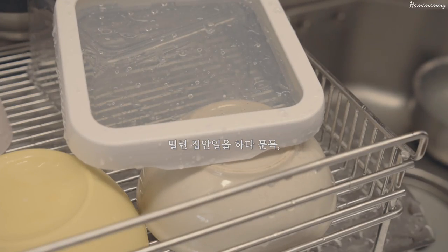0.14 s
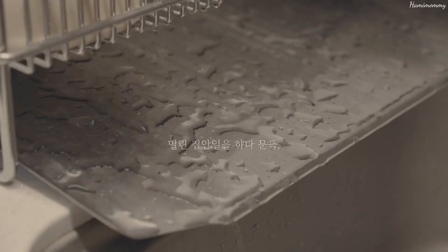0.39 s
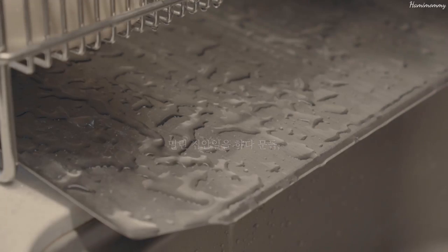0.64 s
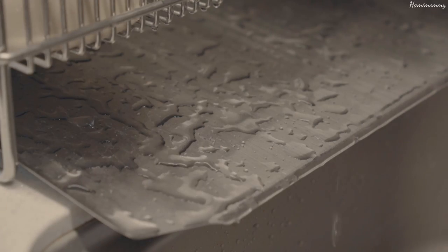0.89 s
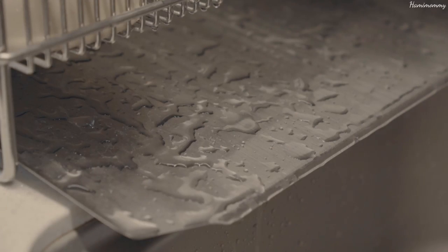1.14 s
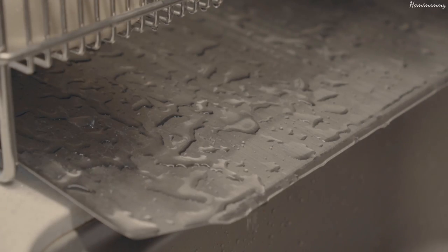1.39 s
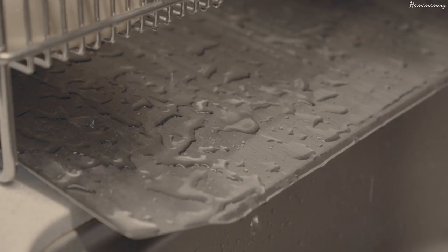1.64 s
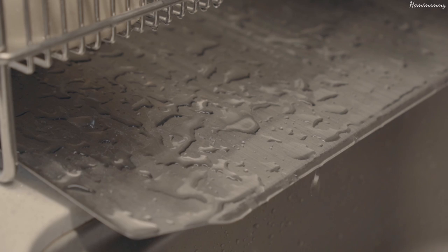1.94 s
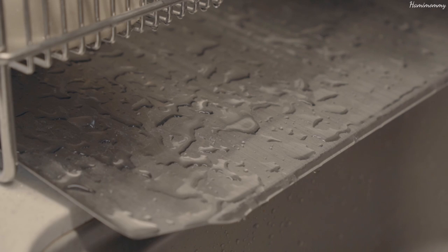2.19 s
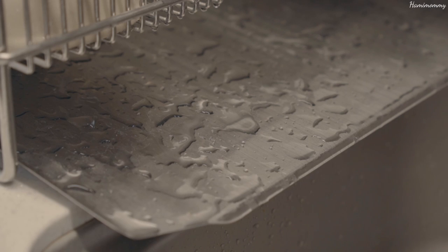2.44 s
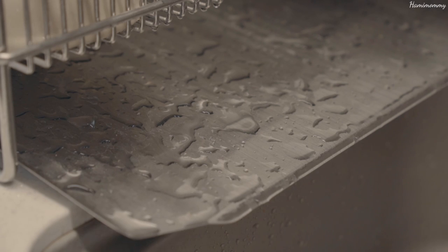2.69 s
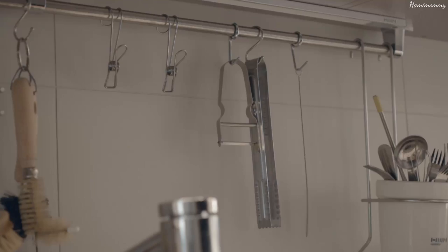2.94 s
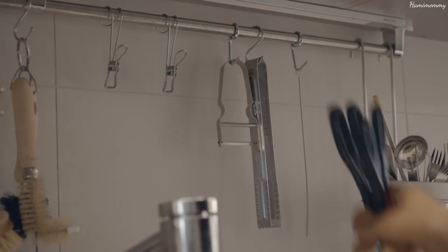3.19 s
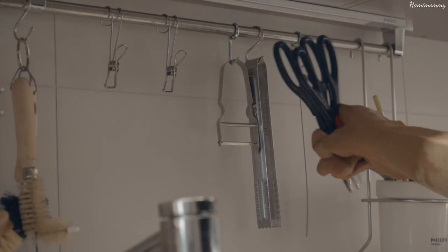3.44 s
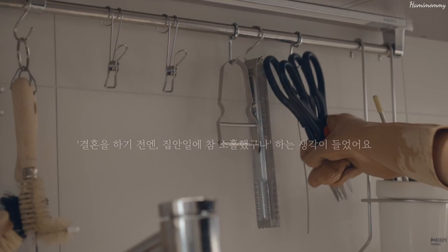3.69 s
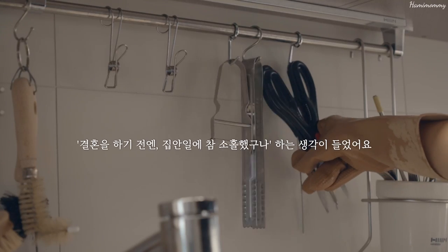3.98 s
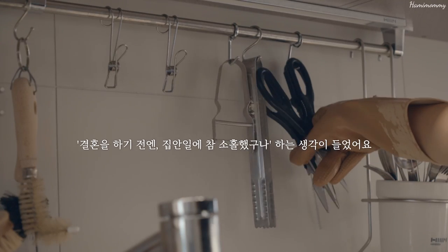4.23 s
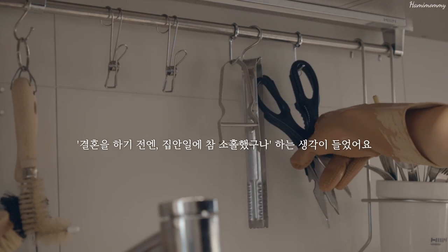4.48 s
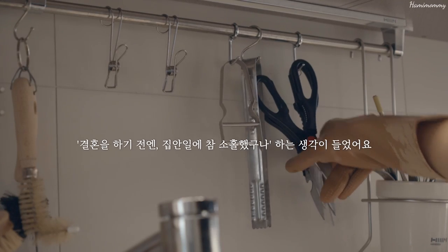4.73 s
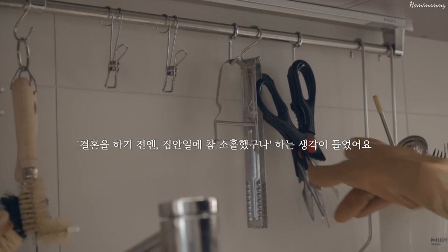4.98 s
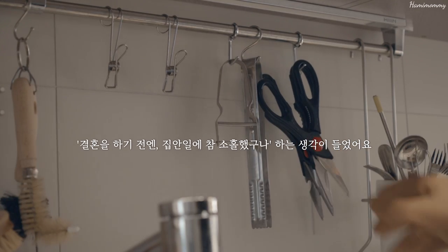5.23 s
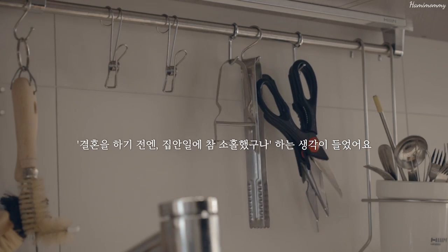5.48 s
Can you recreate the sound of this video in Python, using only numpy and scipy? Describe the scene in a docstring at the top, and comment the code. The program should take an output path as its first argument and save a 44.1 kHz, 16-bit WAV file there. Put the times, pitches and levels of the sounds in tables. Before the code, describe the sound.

Hollow plastic clatter and wet squelches, a short gush of water in a sink, then a hard cut to close, bright scissors jingling on a hook.

```python
"""Wet plastic tubs knock and squelch in a wire rack, then a tap runs into a steel sink and fades out. After a hard
cut, closer and louder, scissors are hung on a hook, clinking and sliding on the steel rail.
Knocks, clinks and sliding drive banks of ringing modes; water is clicks and noise given a colour, plus bubble tones.
Each shot has its own room tone and its own share of the kitchen's reverberation."""
import sys
import numpy as np
from scipy import signal
from scipy.fft import rfft, irfft, next_fast_len
from scipy.io import wavfile
from scipy.ndimage import uniform_filter1d

SR = 44100
rng = np.random.default_rng(int(sys.argv[2]) if len(sys.argv) > 2 else 0)


def unload_audio(sound):
    """Save the sound as a 16-bit wav file, at the path given as the first command line argument."""
    columns = np.transpose(np.atleast_2d(sound))
    # keep every value between -1 and 1, then stretch to whole-number steps
    steps = np.round(np.clip(columns, -1, 1) * 32767)
    wavfile.write(sys.argv[1], SR, steps.astype(np.int16))


def undo_db(level):
    """Turn decibels back into plain size, where 20 dB means ten times bigger."""
    steps = np.asarray(level, float) / 20
    return 10 ** steps


N = 247842   # length in samples
CUT_S = 3.0065   # the far shot ends, the close shot starts

# Room tone of the two shots. Each row: frequency in Hz, relative density in dB per Hz.
FAR_TONE = [(12, -25), (20, 6.5), (85, -7), (129, 3), (185, -13), (382, -8), (581, -13.5), (1040, -15.5),
            (2210, -24.5), (3350, -25.5), (15500, -37)]
CLOSE_TONE = [(12, -26), (20, 3), (185, -5.5), (298, -2), (452, -10.5), (725, -8), (811, -8.5),
              (1770, -18.5), (5090, -27), (8400, -29), (15500, -44)]
# Loudness of the far tone. Each row: time in seconds, rms level in dB.
FAR_LEVEL = [(0, -53.5), (.5, -62.5), (1, -61), (1.4, -65.5), (2, -60), (2.5, -64), (2.9, -89), (3, -100)]
CLOSE_DB = -49   # the close tone drifts about this level
# Rumble of the moving arm. Each row: frequency in Hz, relative density in dB per Hz.
RUMBLE_COLOUR = [(12, -37), (20, -3), (32, -3), (54, -15), (114, 0.5), (157, -9.5), (274, -5), (397, -8),
                 (600, -7.5), (780, -9.5), (1320, -120)]
# Arm rumble at mean effort, its share of the swing in effort, and the span that smooths the effort
ARM_DB, ARM_FOLLOWS, ARM_SMOOTH_S = -48.5, 0.64, 0.097
KITCHEN_T60_S, WALL_CUT_HZ = 0.35, 12000   # decay at low pitch; treble cut on every round

# Tubs and bowls knocking. Each row: time in seconds, level in dB before layer offsets, pitch in Hz.
KNOCKS = [(0.015, -38.5, 830), (0.098, -43, 1250), (0.15, -32, 1110), (0.17, -23, 1210), (0.195, -32, 1470),
          (0.228, -29, 1220), (0.259, -34.5, 930), (0.368, -44, 910), (0.399, -36, 1470),
          (0.462, -44, 1380), (0.478, -32, 1420), (0.519, -27, 1230), (0.565, -25, 1355),
          (0.609, -25.5, 1570), (0.64, -33, 916), (0.714, -39, 1410), (0.746, -53, 975),
          (0.764, -32.5, 826), (0.789, -48, 1350), (1.062, -34.5, 1200), (1.057, -46, 1650),
          (1.075, -39, 1000), (1.082, -42, 708), (1.088, -42.5, 450), (1.278, -56, 1230),
          (1.483, -52, 1440), (1.547, -45.5, 680)]
# Modes of hollow plastic. Each row: frequency in Hz, relative level in dB, 60 dB decay in seconds.
TUB_MODES = [(322, -41, 0.13), (455.5, -12.5, 0.16), (766, -16, 0.12), (935, -5.5, 0.087),
             (1110, -8.5, 0.026), (1230, -4, 0.018), (1380, -1, 0.024), (1570, -0.5, 0.019),
             (1793, -5.5, 0.057), (2020, -15, 0.041), (2400, -12, 0.035), (2890, -17, 0.036)]
# Tubs dragged over the rack wires. Each row: start in seconds, hold in seconds, drag in dB before layer offsets,
# wet squelch relative to the drag in dB, tone of contact in Hz.
STROKES = [(.012, 0.0089, -45.5, -20, 1110), (.095, 0.035, -49, -17, 1170), (.165, 0.048, -42, -28, 1250),
           (.26, 0.014, -47, -12, 1000), (.305, 0.038, -53, -13, 1140), (.37, .06, -50, -12, 1250),
           (.461, 0.075, -43.5, -14, 1300), (0.565, 0.066, -41, -8, 1410), (.69, 0.021, -58, -16, 1220),
           (0.75, 0.041, -41, -10.5, 1170), (.86, .1, -61.5, -14, 1100), (1.064, 0.021, -42.5, -17.5, 1140),
           (1.14, 0.065, -64, -23, 1200), (1.28, .005, -68, -24, 1150), (1.487, 0.017, -68, -4, 1180)]
GRIP_DB_PER_S, LET_GO_DB_PER_S = 1800, 309   # how fast a stroke sets in and dies
# Colour of wet squelch. Each row: frequency in Hz, relative density in dB per Hz.
SQUELCH = [(1290, -19), (2200, 1.5), (3620, -5), (5960, -7.5), (6520, -12.5), (7250, -8.5), (9970, -20.5),
           (15500, -28)]
# Light ticks on the rack wires. Each row: time in seconds, level in dB before layer offsets, pitch in Hz.
WIRE_TICKS = [(.02, -45, 5000), (.133, -42, 2900), (.135, -42.5, 3700), (.262, -41, 4120),
              (.268, -40, 5700), (.52, -41, 3120), (.755, -39, 4900), (.99, -54, 10500), (1.058, -45, 3560),
              (1.065, -38, 2400), (1.36, -55.5, 3350), (1.362, -59, 7100), (1.51, -54, 7600)]
# Modes of a glass rim. Each row: frequency in Hz, level in dB, 60 dB decay in seconds.
GLASS_MODES = [(4253, -57, .26), (8538, -57, .16), (7617, -63, .08)]
GLASS_TOUCH_S = 1.062

# The tap opens, surges once and is faded out. Each row: time in seconds, spray level in dB.
FLOW = [(1.47, -85), (1.53, -70), (1.555, -58), (1.585, -58), (1.61, -49.5), (1.8, -49), (1.832, -40),
        (2.02, -47.5), (2.35, -48), (2.7, -54), (2.82, -61.5), (2.96, -71.5), (3.0, -102)]
# Colours of the spray and of the drumming basin. Each row: frequency in Hz, relative density in dB per Hz.
SPRAY = [(710, -12), (1200, -3), (1350, -11), (1550, -2.5), (2090, -5.5), (2800, -2), (6440, -2),
         (8070, -0.5), (10100, -7.5), (13900, -8.5), (15500, -12.5)]
BASIN = [(35, -47), (60, -32), (114, 3.5), (290, -10), (449, -1.5), (623, -4), (1920, -9), (2500, -24),
         (3250, -32), (5500, -120)]
# Gulps of water landing. Each row: time in seconds, level in dB before layer offsets, bubble pitch in Hz,
# basin boom in dB.
SPLASHES = [(1.592, -31.5, 7950, -54), (1.808, -34.5, 3360, -80), (1.83, -24, 2000, -47),
            (1.866, -25.5, 3370, -53), (1.956, -31.5, 7970, -53), (2.215, -37, 3400, -58),
            (2.381, -39, 1250, -45.5), (2.565, -36, 4530, -80), (2.711, -40, 5730, -83)]
# Modes of the steel basin. Each row: frequency in Hz, relative level in dB, 60 dB decay in seconds.
BASIN_MODES = [(98, -4, .22), (118, -2, .25), (150, -4, .15), (210, -6, .1), (320, -8, .08),
               (460, -10, .06), (950, -12, .05)]
# Drumming relative to the spray; what a gulp adds relative to its boom, and how fast that dies
DRUM_DB, GULP_DRUM_DB, GULP_T60_S = -12.5, -2, 0.16

# Scissors striking hook and rail. Each row: time in seconds, crack in dB, blade ring in dB, handle knock in dB
# (all before layer offsets), favoured pitch in Hz.
CLINKS = [(3.0093, -30.5, -44.5, -41, 870), (3.0664, -48, -58, -46.5, 1570), (3.1248, -51, -72, -43, 774),
          (3.2126, -35.5, -58, -57, 751), (3.2894, -24, -25.5, -59, 3400), (3.3852, -26, -33, -73, 3404),
          (3.6344, -33, -68, -42, 1570), (3.6568, -5, -24.5, -49, 3527), (3.6844, -16, -36, -19, 2080),
          (3.7259, -12.5, -59, -22.5, 3424), (3.788, -11.5, -35, -20.5, 1930),
          (3.8206, -15, -52, -16.5, 1650), (3.8392, -10, -28, -21.5, 2080), (3.8695, -14, -16.5, -38, 2330),
          (3.901, -15, -29, -35, 2330), (3.9868, -23.5, -25, -36, 2890),
          (4.0537, -23.5, -35.5, -20.5, 1690), (4.0654, -34, -53, -23.5, 586),
          (4.2171, -25.5, -50, -29.5, 2350), (4.2427, -20, -17, -29, 2070), (4.2605, -32, -39, -37, 620),
          (4.375, -14, -78, -31, 2820), (4.3975, -53, -24, -41, 1690), (4.4114, -10, -18, -40, 2740),
          (4.429, -20, -22, -29.5, 2890), (4.4695, -14.5, -27, -19, 1484), (4.5788, -13, -34, -48, 3100),
          (4.6584, -19.5, -27, -42, 2890), (4.7084, -30.5, -56, -28, 1482), (4.8881, -27, -42, -32.5, 880),
          (4.8915, -36, -52, -41.5, 2890), (4.9532, -26, -47.5, -32.5, 680), (5.0529, -48, -71, -31, 1690),
          (5.0735, -36, -55, -35.5, 380), (5.1984, -55, -70, -48, 2627), (5.2184, -50, -65, -40, 1110),
          (5.2314, -46, -61, -43.5, 670), (5.2794, -47, -71, -48, 692), (5.3094, -53, -61, -56, 699),
          (5.3916, -53, -65, -51, 1950), (5.4272, -53, -67, -40.5, 1120), (5.4744, -45, -56, -37.5, 875),
          (5.5114, -31.5, -67, -38, 2590), (5.5634, -55, -63, -44, 1030)]
# Effort of the hand that slides the scissors on the hook. Each row: time in seconds, effort in dB.
HAND = [(3.0, -62), (3.02, -46), (3.3, -53), (3.64, -59.5), (3.67, -28.5), (3.85, -24.5), (3.98, -26),
        (4.09, -32), (4.2, -35.5), (4.25, -28.5), (4.39, -36.5), (4.42, -25.5), (4.57, -31.5),
        (4.74, -38.5), (4.87, -52), (4.9, -42.5), (5.16, -53), (5.62, -48.5)]
# Modes of steel blades, of plastic handles with pivot, and of hook with rail. Each row: frequency in Hz,
# relative level in dB, 60 dB decay in seconds.
BLADE_MODES = [(4290, -14, .12), (4797, -12, .12), (5733, -14, .1), (6751, -14, .12), (7267, -6, .2),
               (7580, -8, .15), (7908, -3, .16), (8090, -8, .1), (8678, -3, .18), (8818, -3, .16),
               (9292, -6, .22), (10050, -9, .18), (10630, -9, .22), (11360, -8, .22), (11760, -11, .15),
               (12210, -10, .15), (12350, -7, .2), (12820, -11, .2), (12940, -9, .2), (13680, -13, .15),
               (13890, -12, .13), (14260, -12, .22), (14490, -13, .13), (14690, -10, .22),
               (14950, -12, .13), (15590, -12, .15)]
HANDLE_MODES = [(587, -2, .09), (680, -5, .07), (874, -6, .08), (1114, -6, .07), (1520, -3, .07),
                (1570, -3, .08), (1755, -5, .07), (1949, -3, .08), (2085, -2, .08), (2142, -2, .09),
                (2186, -3, .08), (2327, -5, .07), (2675, -7, .08), (2891, -7, .1)]
HOOK_MODES = [(380, -25, .16), (587, -25, .1), (2675, -25, .13), (2891, -25, .14), (3445, -28, .09),
              (3476, -28, .09)]
# Colour of the crack. Each row: frequency in Hz, relative level in dB.
CRACK = [(700, -43), (1200, -7.5), (2100, -3), (3500, -1.5), (5500, -7), (7500, -10.5), (11000, -32),
         (15500, -38)]
# Colours of bright glint and dull scuff. Each row: frequency in Hz, relative density in dB per Hz.
GLINT = [(3000, -1.5), (7000, 8), (8500, 13.5), (10000, 6), (16000, 2.5)]
SCUFF = [(250, -40), (600, 6.5), (2000, 4), (5000, -16)]
HANDLE_LIFT_DB = 18   # of the handle modes near the favoured pitch
HOOK_BY_CRACK_DB, HOOK_BY_HANDLE_DB = -10.5, 2   # the stronger of the two drives the hook
RATTLE_DB, RATTLE_T60_S = -4, 0.35   # blades rattle on after each clink, relative to their ring
BLADE_SLIDE_DB = -27   # what sliding adds to the rattle, relative to the effort
LOOSENED_S, GRIP_DAMPS_DB = 3.6, -12   # until this time a tight grip damps the blades, so early clinks sound dry


def rms_one(x):
    """Scale to unit rms."""
    return x / np.sqrt(np.mean(x ** 2) + 1e-20)


def noise():
    """White noise of unit spread."""
    return rng.standard_normal(N)


def in_time(rows):
    """Draw each column of a curve at every sample, very low outside its span."""
    s, *columns = np.transpose(rows)
    t = np.arange(N) / SR
    return [np.interp(t, s, column, left=-120, right=-120) for column in columns]


def coloured(x, spectrum):
    """Give a sound a spectrum; white noise of unit rms keeps unit rms."""
    hz, db = np.transpose(spectrum)
    size = next_fast_len(len(x))
    bins_hz = np.arange(size // 2 + 1) * SR / size
    gain = undo_db(np.interp(np.log(bins_hz + 1), np.log(hz), db))
    return irfft(rfft(x, size) * rms_one(gain), size)[:len(x)]


def drift(rate_hz):
    """Slow chance of unit rms: noise through two equal low-pass poles."""
    r = np.exp(-2 * np.pi * rate_hz / SR)
    slow = signal.lfilter([1], [1, -2 * r, r * r], rng.standard_normal(N + SR))
    return rms_one(slow[SR:])   # the first second lets the filter settle


def ring(clicks, hz, t60):
    """A two-pole resonance: a unit click sets a dying sine of height 1 ringing."""
    r, w = undo_db(-60 / (t60 * SR)), 2 * np.pi * hz / SR
    return signal.lfilter([0, np.sin(w)], [1, -2 * r * np.cos(w), r * r], clicks + 1e-18)


def grains(per_s, spread_db):
    """Random clicks of uneven size and sign, unit rms."""
    sizes = undo_db(spread_db * np.minimum(rng.exponential(1, N), 5)) * rng.choice([-1, 1], N)
    return rms_one(sizes * (rng.random(N) < per_s / SR))


def spikes(times, sizes):
    """One click per event."""
    out = np.zeros(N)
    out[np.round(np.asarray(times) * SR).astype(int)] = sizes
    return out


def bursts(times, db, t60):
    """Envelope of sudden bursts, each falling 60 dB in t60 seconds."""
    out = np.zeros(N)
    for s, level_db in zip(times, db):
        tail = out[round(s * SR):]
        tail += undo_db(level_db - 60 * np.arange(len(tail)) / SR / t60)
    return out


def blips(rows, offset_db, cycles):
    """Short tones that swell and die: a click through the same resonance twice."""
    out = 0
    for at, level_db, hz, *_ in rows:
        t60 = cycles / hz
        tone = ring(ring(spikes([at], 1), hz, t60), hz, t60)
        out = out + undo_db(level_db + offset_db) * tone / np.abs(tone).max()
    return out


def struck(modes, times, db, favoured_hz, rubbing, favour_db, reach, scatter_db, chatter_s):
    """Blows, their brief chatter and rubbing drive one set of modes; favour_db tilts those near the favoured pitch."""
    chance, out = rng.standard_normal((len(times), len(modes))), 0
    sides = rng.choice([-1, 1], chance.shape)   # each mode starts inward or outward, as the spot struck decides
    touches = grains(6000, spread_db=1.5)
    fade = undo_db(-60 / (chatter_s * SR))
    for k, (hz, mode_db, t60) in enumerate(modes):
        tilt_db = favour_db * np.exp(-(np.log(hz / favoured_hz) / reach) ** 2)
        blows = spikes(times, sides[:, k] * undo_db(db + tilt_db + scatter_db * chance[:, k]))
        envelope = np.sqrt(1 - fade ** 2) * signal.lfilter([1], [1, -fade], blows + 1e-18)
        chatter = envelope * np.roll(touches, 997 * k)   # shifted, so that modes do not chatter in step
        rubbed = rubbing(hz) * np.sqrt(60 / (t60 * SR))   # long modes gather more, so they are fed less
        out = out + undo_db(mode_db) * ring(blows + .5 * chatter + rubbed, hz, t60)
    return out


def no_rubbing(mode_hz):
    """Leave the modes to the blows alone."""
    return 0


def room_tone(close):
    """Far hum and air, louder in the close shot, where the moving arm adds rumble."""
    far = undo_db(in_time(FAR_LEVEL)[0]) * coloured(noise(), FAR_TONE)
    near = undo_db(CLOSE_DB + 1.5 * drift(9.1)) * coloured(noise(), CLOSE_TONE)
    effort_db = uniform_filter1d(in_time(HAND)[0], 1 + round(ARM_SMOOTH_S * SR), mode="nearest")
    swing_db = ARM_FOLLOWS * (effort_db - effort_db[close].mean())
    rumble = undo_db(ARM_DB + swing_db + 2.7 * drift(14.0)) * coloured(noise(), RUMBLE_COLOUR)
    return np.where(close, near + rumble, far)


def kitchen(x):
    """Tiled walls: ten feedback delays, duller on every round."""
    size = next_fast_len(N + SR)
    turn = np.exp(-2j * np.pi * np.arange(size // 2 + 1) / size)   # a delay of one sample
    dull = np.exp(-2 * np.pi * WALL_CUT_HZ / SR)
    low_pass = (1 - dull) / (1 - dull * turn)
    walls = 0
    for lag in (rng.uniform(.009, .03, 10) * SR).astype(int):
        loop = undo_db(-60 * lag / SR / KITCHEN_T60_S) * low_pass * turn ** lag
        walls = walls + loop / (1 - loop)
    return irfft(rfft(x, size) * walls, size)[:N]


def strokes():
    """Every stroke grips fast, holds and lets go; gains of drag and squelch, and the tone of the loudest."""
    start, held, db, wet_db, hz = np.transpose(STROKES)[:, :, None]
    t = np.arange(N) / SR
    grip_db = GRIP_DB_PER_S * np.maximum(start - t, 0)
    let_go_db = LET_GO_DB_PER_S * np.maximum(t - start - held, 0)
    gain = undo_db(np.maximum(db - grip_db - let_go_db, -140))
    return gain.sum(axis=0), (gain * undo_db(wet_db)).sum(axis=0), hz[gain.argmax(axis=0), 0]


def tubs(drag, tone_hz):
    """Knocks and dense slips of wet plastic on wire ring the hollow tubs."""
    s, db, hz = np.transpose(KNOCKS)
    slips = drag * undo_db(-16 + 2.2 * drift(29)) * grains(2000, spread_db=2.5)

    def rubbing(mode_hz):
        """The place of contact wanders, and with it the modes that speak most."""
        return slips * undo_db(6.1 * np.exp(-(np.log(mode_hz / tone_hz) / 0.14) ** 2))

    body = struck(TUB_MODES, s, db - 19.5, hz, rubbing, favour_db=-4, reach=.13, scatter_db=5.5, chatter_s=0.053)
    return body + blips(KNOCKS, offset_db=-8.0, cycles=24)


def wire_ticks():
    """Light ticks on the wires: a short tone and a snap of noise each."""
    s, db, _ = np.transpose(WIRE_TICKS)
    snaps = bursts(s, db - 14, 0.056) * coloured(noise(), SQUELCH)
    return blips(WIRE_TICKS, offset_db=-6, cycles=40) + snaps


def glass():
    """One touch sets the modes of a glass rim ringing."""
    return sum(ring(spikes([GLASS_TOUCH_S], undo_db(db)), hz, t60) for hz, db, t60 in GLASS_MODES)


def rack():
    """Tubs knock and drag, water films squelch above as coloured grains, wires tick and a glass is touched."""
    drag, wet, tone_hz = strokes()
    squelch = wet * undo_db(1.5 * drift(60)) * coloured(grains(3500, spread_db=2.0), SQUELCH)
    return tubs(drag, tone_hz) + wire_ticks() + squelch + glass()


def fizz():
    """Tiny bubbles ring a few cycles each, dealt over 24 pitches, unit rms."""
    born, dealt = grains(2000, spread_db=3.0), rng.integers(0, 24, N)
    out = 0
    for k, hz in enumerate(np.geomspace(2500, 9000, 24)):
        t60 = 60 / hz
        out = out + ring(ring(born * (dealt == k), hz, t60), hz, t60) * hz / SR
    return rms_one(out)


def tap():
    """Fine spray hisses, bubbles fizz, the stream drums on the basin; gulps slap, bubble and boom."""
    spray_db, = in_time(FLOW)
    s, db, _, boom_db = np.transpose(SPLASHES)
    hiss = coloured(grains(12000, spread_db=2.5), SPRAY) * undo_db(1.3 * drift(25))
    spray = undo_db(spray_db) * (hiss + undo_db(-7.5) * fizz())
    drum_gain = undo_db(spray_db + DRUM_DB) + bursts(s, boom_db + GULP_DRUM_DB, GULP_T60_S)
    drum = drum_gain * undo_db(2.8 * drift(21)) * coloured(noise(), BASIN)
    slap_gain = bursts(s, db - 11.5, 0.08) + bursts(s, db - 17.0, 0.0089)
    slaps = slap_gain * coloured(noise(), SPRAY)
    booms = struck(BASIN_MODES, s, boom_db, 112, no_rubbing, favour_db=-2.5, reach=1, scatter_db=2.5,
                   chatter_s=0.023)
    bubbles = blips(SPLASHES, offset_db=-3.5, cycles=17)
    return spray + drum + slaps + bubbles + booms


def cracks(s, crack_db):
    """A crack is a crowd of quickly dying modes, mixed anew by every blow, and a burst of dense grains."""
    crowd_hz = np.geomspace(1300, 9000, 32) * rng.uniform(.98, 1.02, 32)
    colour_hz, colour_db = np.transpose(CRACK)
    crowd_db = np.interp(np.log(crowd_hz), np.log(colour_hz), colour_db) + 10 * np.log10(crowd_hz / 2000)
    crowd = [(hz, db, .035) for hz, db in zip(crowd_hz, crowd_db)]
    modes = struck(crowd, s, crack_db - 25.5, 1000, no_rubbing, favour_db=-9, reach=.05, scatter_db=3.5,
                   chatter_s=0.11)
    return modes + bursts(s, crack_db - 15.5, 0.15) * coloured(grains(5000, spread_db=0.5), CRACK)


def hook(s, crack_db, handle_db, pitch_hz):
    """Hook and rail sing as hard as the stronger of crack and handle knock drives them."""
    ring_db = np.maximum(crack_db + HOOK_BY_CRACK_DB, handle_db + HOOK_BY_HANDLE_DB)
    return struck(HOOK_MODES, s, ring_db, pitch_hz, no_rubbing, favour_db=25, reach=.04, scatter_db=1,
                  chatter_s=.03)


def scissors():
    """Each clink is a crack plus ringing blades, handles and hook; sliding feeds blades and handles with small ticks."""
    s, crack_db, blade_db, handle_db, pitch_hz = np.transpose(CLINKS)
    hand_db, = in_time(HAND)
    free_db = blade_db + GRIP_DAMPS_DB * (s < LOOSENED_S)
    rattle = bursts(s, free_db + RATTLE_DB, RATTLE_T60_S) + undo_db(hand_db + BLADE_SLIDE_DB)
    ticks = grains(500, spread_db=3.5) * undo_db(1.2 * drift(80))
    blade_rub, handle_rub = rattle * undo_db(-20) * ticks, undo_db(hand_db - 27.0) * ticks
    blades = struck(BLADE_MODES, s, free_db - 16, 8300, lambda mode_hz: blade_rub, favour_db=2,
                    reach=.05, scatter_db=4.5, chatter_s=.05)
    handles = struck(HANDLE_MODES, s, handle_db - 17.0, pitch_hz, lambda mode_hz: handle_rub,
                     favour_db=HANDLE_LIFT_DB, reach=.05, scatter_db=3.5, chatter_s=.05)
    snap = bursts(s, blade_db - 4.5, 0.03)   # the first instant of contact
    glint_gain = snap + bursts(s, blade_db - 7, 0.11) + rattle * undo_db(-10.5)
    glint = glint_gain * coloured(grains(6600, spread_db=-1.5), GLINT)
    scuff_gain = bursts(s, handle_db - 13, 0.1) + undo_db(hand_db - 9)
    scuff = scuff_gain * coloured(grains(2500, spread_db=3.0), SCUFF)
    return hook(s, crack_db, handle_db, pitch_hz) + blades + handles + cracks(s, crack_db) + glint + scuff


def scene():
    """The shots are joined by a hard cut, each with its own share of room."""
    close = np.arange(N) >= CUT_S * SR
    sink, rail = rack() + tap(), scissors() * close
    sink = sink + undo_db(-23.5) * kitchen(sink)
    rail = rail + undo_db(-19.0) * kitchen(rail)
    return (np.where(close, rail, sink) + room_tone(close))[None]


def top_cut(x):
    """Nothing passes above the cut-off."""
    return signal.sosfilt(signal.butter(12, 17000, fs=SR, output="sos"), x)


def record(dry):
    """A steep low-pass cuts the top of the treble, 32 dB down from 16 kHz up."""
    low_pass = signal.cheby2(14, 32, 16000, fs=SR, output="sos")
    mix = signal.sosfilt(low_pass, dry)
    return top_cut(mix)


dry = scene()
out = record(dry)
unload_audio(out)
```